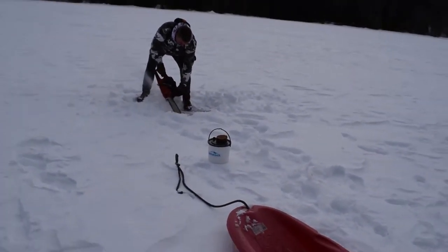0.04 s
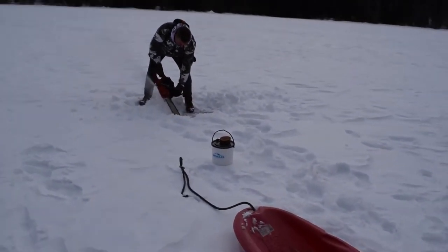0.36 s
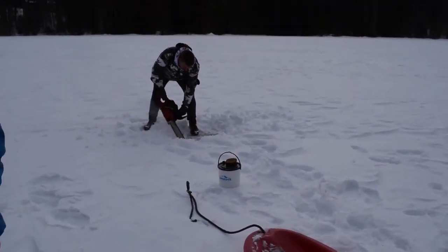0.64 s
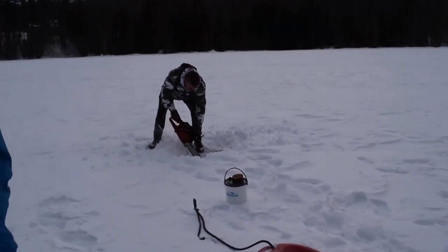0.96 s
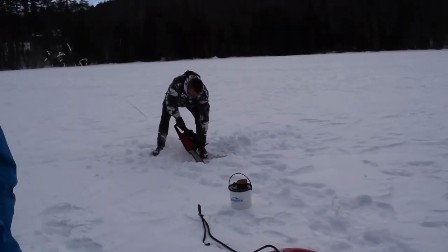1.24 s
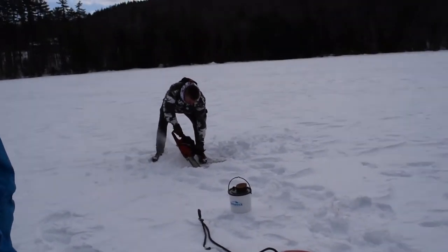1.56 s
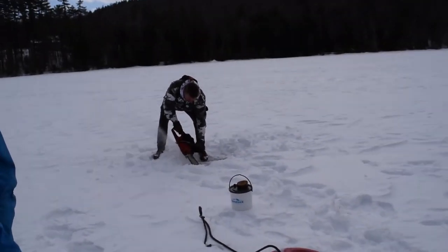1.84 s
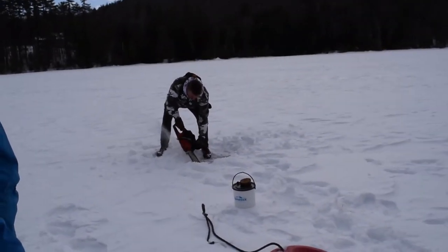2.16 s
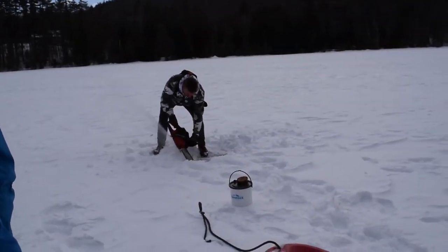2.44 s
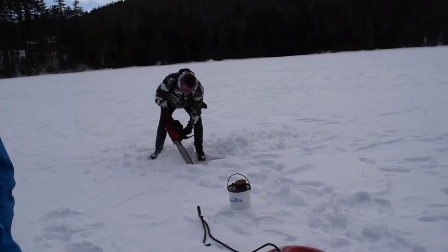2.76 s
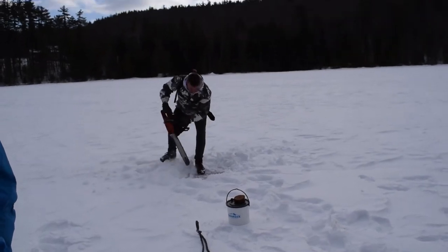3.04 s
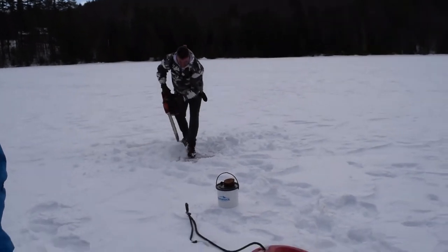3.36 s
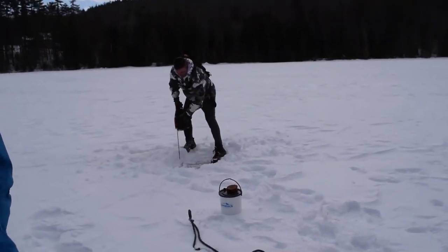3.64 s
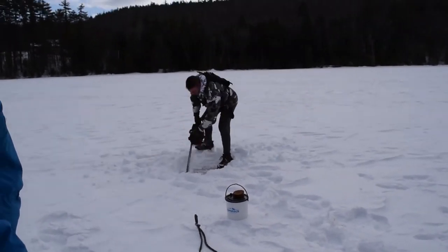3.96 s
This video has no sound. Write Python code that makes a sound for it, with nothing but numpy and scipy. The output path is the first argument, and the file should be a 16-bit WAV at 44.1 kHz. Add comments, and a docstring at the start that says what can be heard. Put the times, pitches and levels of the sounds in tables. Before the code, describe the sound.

A chainsaw cuts ice at full throttle a few metres away outdoors, a steady drone and whine with chain rattle and hissing spray. At about 2.6 seconds the throttle is released and the engine falls in pitch and level. It pops unevenly near idle from about 3.3 seconds, then revs up again from 3.8 to the end at 4 seconds. A light breeze rumbles underneath throughout.

```python
"""A two-stroke chainsaw cuts lake ice at full throttle, a few metres away in open snow.
Its exhaust drone, fan whine and piston buzz are harmonic series locked to the crankshaft; the many
small impacts of chain and ice spray add up to noise. The throttle is let go: the engine coasts down,
single firings ring the muffler near idle, and it revs up again. A light breeze rumbles underneath."""
import sys
import numpy as np
from scipy import signal
from scipy.fft import rfft, irfft
from scipy.io import wavfile
from scipy.ndimage import uniform_filter1d

SR = 44100
rng = np.random.default_rng(int(sys.argv[2]) if len(sys.argv) > 2 else 0)


def store_wav(level_fs):
    """Save 16-bit WAV to argv[1]."""
    pcm = np.round(np.clip(np.atleast_2d(level_fs), -1, 1) * 32767)
    wavfile.write(sys.argv[1], SR, pcm.T.astype(np.int16))


N = 176400
T = np.arange(N) / SR
RELEASE_S, REOPEN_S = 2.632, 3.808   # the throttle is let go, then opened again
WORKING_HZ = 209.5   # usual crankshaft speed in the cut; an order is a multiple of the crankshaft speed
GRAIN_DB = 1.5   # spread in the strength of small impacts

# envelope shared by chain rattle and piston buzz: t/s, level/dB
MECHANICAL_LEVEL = [(0, -29), (.55, -29), (.8, -27.5), (1.2, -28.5), (2.3, -30), (2.62, -28.5),
                    (2.87, -35.5), (3.13, -44), (3.29, -48), (3.52, -53), (3.65, -66), (3.79, -66),
                    (3.87, -46), (4, -36.5)]


def from_db(db):
    """Amplitude ratio of a level in decibels."""
    return 10 ** (np.asarray(db) / 20)


def unit_rms(x):
    """Normalisation to rms 1."""
    return x / np.sqrt(np.mean(x ** 2) + 1e-20)


def in_time(rows):
    """Linear interpolation of (t/s, value) rows."""
    return np.interp(T, *np.transpose(rows))


def drift(corner_hz):
    """Slow random fluctuation: low-passed noise of rms 1."""
    f = np.arange(N // 2 + 1) * SR / N
    return unit_rms(irfft(rfft(rng.standard_normal(N)) / (1 + (f / corner_hz) ** 2), N))


def colour(x, spectrum):
    """Spectral shaping by (f/Hz, level/dB) rows; white noise keeps its power."""
    hz, db = np.transpose(spectrum)
    f = np.arange(N + 1) * SR / (2 * N) + 1
    gain = from_db(np.interp(np.log(f), np.log(hz), db)) * np.minimum(f / hz[0], 1)
    return irfft(rfft(x, 2 * N) * unit_rms(gain))[:N]


def tone(turns, order):
    """A sinusoid of rms 1, phase-locked to the crankshaft."""
    return np.sqrt(2) * np.sin(2 * np.pi * (order * turns + rng.random()))


def impulses(rows):
    """One impulse for each (t/s, level/dB) row."""
    times, db = np.transpose(rows)
    clicks = np.zeros(N)
    clicks[(times * SR).astype(int)] = from_db(db)
    return clicks


def ring(clicks, hz, t60):
    """Damped oscillator: each impulse excites an exponentially decaying sinusoid."""
    r, w = from_db(-60 / (t60 * SR)), 2 * np.pi * hz / SR
    return signal.lfilter([0, np.sin(w)], [1, -2 * r * np.cos(w), r * r], clicks + 1e-18)


def puff(clicks, decay_s, spectrum):
    """Turbulent outflow: each impulse releases an exponentially decaying burst of gas noise."""
    envelope = signal.lfilter([1], [1, -np.exp(-1 / (decay_s * SR))], clicks + 1e-18)
    return colour(envelope * rng.standard_normal(N), spectrum)


def crank_harmonics(turns, size=8192, count=140, half_order_db=-10, jitter_turns=0.002):
    """A period of two turns gives whole orders and weaker half orders; phase jitter broadens them."""
    k = np.arange(1, count)
    partials = from_db(half_order_db * (k % 2)) * np.exp(2j * np.pi * rng.random(len(k)))
    cycle = unit_rms(irfft(np.r_[0, partials], size))
    angle = turns + jitter_turns * drift(93)
    return np.interp(angle / 2 % 1 * size, np.arange(size), cycle)


def wind(in_cut):
    """Turbulence: gusting low-frequency noise, with more rumble while the saw cuts."""
    # wind spectrum: f/Hz, relative level/dB
    spectrum = [(20, -12), (50, -1), (85, 4), (280, -3.5), (500, -17.5), (2000, -12), (12000, -47)]
    gusts = from_db(-48.5 + 2.5 * drift(18))
    rumble = in_cut * from_db(-52 + 2 * drift(9.2))
    return (gusts + rumble) * unit_rms(colour(rng.standard_normal(N), spectrum))


def impact_noise(turns, spectrum, level, throb):
    """Superposition: countless small impacts merge into noise, modulated in step with each turn."""
    bunching = np.exp(throb * (np.cos(2 * np.pi * turns) + 0.52 * np.cos(4 * np.pi * turns)))
    grains = rng.standard_normal(N) * bunching * from_db(GRAIN_DB * drift(1200) + 1.25 * drift(13))
    return from_db(in_time(level)) * unit_rms(colour(grains, spectrum))


def ice_spray(turns):
    """Impacts of the chain and of tiny ice chips sum incoherently to a hiss."""
    # hiss spectrum: f/Hz, relative level/dB
    spectrum = [(3000, -35), (5000, -23), (6100, 5), (7000, -2), (9000, -3.5), (11200, -5), (12500, -11),
                (15500, -20)]
    # hiss envelope: t/s, level/dB
    level = [(0, -39), (.6, -39), (.8, -37.5), (1.3, -42), (2.3, -40.5), (2.65, -41), (2.87, -45.5),
             (3.13, -48.5), (3.29, -54.5), (3.52, -61), (3.65, -75), (3.79, -72), (3.88, -59), (4, -46.5)]
    return impact_noise(turns, spectrum, level, throb=0.13)


def chain_rattle(turns):
    """Impacts of the chain links sum incoherently to a midrange rattle."""
    # rattle spectrum: f/Hz, relative level/dB
    spectrum = [(200, -44), (440, -26.5), (730, -2.5), (1030, -9.5), (1350, 2.5), (1650, -1), (2100, -5.5),
                (2600, -7.5), (3150, -4.5), (3900, -13), (4700, -9.5), (5500, -12.5), (8000, -34.5)]
    return impact_noise(turns, spectrum, MECHANICAL_LEVEL, throb=0.15)


def housing_knocks(turns, loose_share=0.63):
    """Forced vibration: knocks of crank and slack chain excite the modes of bar and housing."""
    # modes: f/Hz, bandwidth/Hz, relative level/dB
    modes = [(750, 183, 3.5), (1636, 180, 0.5), (2621, 120, -15), (3020, 83, -7.5), (4200, 310, -12),
             (4680, 170, -16)]
    # knock envelope: t/s, level/dB
    level = [(2.62, -32), (2.71, -32.5), (2.78, -35), (3.13, -39), (3.29, -41), (3.53, -40.5), (3.66, -45),
             (3.77, -48), (3.84, -41), (4, -41)]
    crank = (1 - loose_share) * crank_harmonics(turns)
    slack = loose_share * rng.standard_normal(N) * from_db(GRAIN_DB * drift(400))
    rings = sum(from_db(db) * signal.lfilter(*signal.iirpeak(hz, hz / width, SR), crank + slack)
                for hz, width, db in modes)
    rings = signal.sosfilt(signal.butter(4, 520, "high", fs=SR, output="sos"), rings)
    running_rms = np.sqrt(uniform_filter1d(rings ** 2, size=6000) + 1e-12)
    return from_db(in_time(level)) * rings / running_rms


def coast_whine(speed, turns, db_per_decade=44):
    """Resonance: falling, fading drive harmonics each swell as they pass a mode of the housing."""
    # drive harmonics: order, level/dB at working speed before the housing's gain
    harmonics = [(4, -32.5), (5, -39.5), (7, -38), (8, -35), (12, -41), (14, -37), (16, -39), (20, -38),
                 (24, -42.5)]
    # housing response: f/Hz, gain/dB
    response = [(550, -11.5), (780, 3), (1200, -7.5), (1540, 5), (1800, -6), (2800, 0)]
    whine = sum(from_db(db + np.interp(k * speed, *np.transpose(response)) + 2 * drift(40))
                * tone(turns, k) for k, db in harmonics)
    return (T < REOPEN_S) * from_db(db_per_decade * np.log10(speed / WORKING_HZ)) * whine


def piston_buzz(turns):
    """Periodic motion of piston and drive radiates a dense harmonic series."""
    # spectral envelope of the buzz: f/Hz, relative level/dB
    spectrum = [(900, -48), (1250, 1), (1850, -0.5), (2200, -4), (2700, 0.5), (3100, -2), (3900, -2.5),
                (4900, -4.5), (6500, -13), (9500, -11), (15000, -27)]
    return from_db(in_time(MECHANICAL_LEVEL) - 3.3) * unit_rms(colour(crank_harmonics(turns), spectrum))


def fan_whine(turns, in_cut):
    """Blade-passing tones of the flywheel, phase-modulated by uneven rotation, more so out of the cut."""
    # fan tones: order, relative level/dB
    tones = [(20, -11), (22, 0.5), (24, -13)]
    # fan envelope: t/s, level/dB
    level = [(0, -30.5), (.45, -29.5), (.56, -26), (.69, -31.5), (1.16, -33.5), (1.38, -30.5), (1.7, -33),
             (1.92, -30.5), (2.05, -33), (2.62, -28), (2.71, -33), (2.78, -41), (2.95, -46), (3.15, -52),
             (3.7, -59), (3.9, -66), (4, -37)]
    jitter_turns = 0.0012 + 0.0023 * (1 - in_cut)
    angle = turns + jitter_turns * drift(78)
    return from_db(in_time(level)) * sum(from_db(db + drift(11.4)) * tone(angle, k) for k, db in tones)


def firings(clicks, ring_db, puff_db, damping):
    """Impulse response: a firing rings the muffler and emits a puff; the ice reflects both."""
    # muffler modes: f/Hz, relative level/dB, T60/s before division by damping
    modes = [(150, -29, 0.016), (280, -21, 0.024), (655, -2, 0.015), (860, -17.5, 0.011),
             (1368, -18.5, 0.014), (1690, -25, 0.012)]
    # spectrum of the gas puff: f/Hz, relative level/dB
    spectrum = [(130, -3), (400, -11), (750, 0), (1900, 2.5), (2600, -14), (4200, -9), (15000, -31)]
    ring_floor_hz = 150   # the muffler rings carry little below this
    reflection_s, reflection_db = 0.001303, -2.5
    rings = sum(from_db(db) * ring(clicks, hz, t60 / damping) for hz, db, t60 in modes)
    rings = signal.sosfilt(signal.butter(1, ring_floor_hz, "high", fs=SR, output="sos"), rings)
    direct = from_db(puff_db) * puff(clicks, 0.002, spectrum) - from_db(ring_db) * rings
    return direct + from_db(reflection_db) * np.interp(T - reflection_s, T, direct)


def idle_pops():
    """Intermittent combustion near idle gives separate, heavily damped transients."""
    # single firings: t/s, excitation level/dB
    pops = [(3.3527, -19.5), (3.4214, -19.5), (3.4933, -21), (3.5540, -19.5), (3.648, -27), (3.6637, -21),
            (3.7448, -19)]
    return firings(impulses(pops), ring_db=1, puff_db=-10.5, damping=3.2)


def exhaust_cracks():
    """Broadband transients: the first hard firings on the reopened throttle crack brightly."""
    # hard firings: t/s, excitation level/dB
    onsets = [(3.8095, -30.5), (3.8375, -29)]
    # crack spectrum: f/Hz, relative level/dB
    spectrum = [(900, 3), (1500, 4), (4500, -5.5), (15000, -28)]
    return puff(impulses(onsets), decay_s=0.0056, spectrum=spectrum)


def rev_up(speed, turns):
    """An accelerating pulse train, one firing a turn, drives the muffler over a rising thump."""
    # thump harmonics: order, level/dB at thump_hz
    harmonics = [(1, -32.5), (2, -43), (3, -43)]
    thump_hz, db_per_decade = 124, 48
    second_wave_s, second_wave_db = 0.00589, -13.5   # a weaker pressure wave follows each firing
    is_open = T >= REOPEN_S
    thump_gain = is_open * from_db(db_per_decade * np.log10(speed / thump_hz))
    thump = thump_gain * sum(from_db(db) * tone(turns, k) for k, db in harmonics)
    pulses = np.diff(np.ceil(np.cumsum(speed * is_open) / SR), prepend=0)
    pulses = pulses + from_db(second_wave_db) * np.interp(T - second_wave_s, T, pulses)
    weak_start_db = -4 * np.exp(-np.maximum(T - REOPEN_S, 0) / 0.018)
    strength = from_db(-19.5 + weak_start_db + 0.8 * drift(60))
    return thump + firings(pulses * strength, ring_db=5, puff_db=-17, damping=0.75)


def engine_speed(idle_hz=32.99, coast_s=0.492, reopen_hz=60.75, rise_hz_per_s=360):
    """Rotation sets the fundamental: high in the cut, relaxing towards idle, then rising linearly."""
    # crankshaft speed under load: t/s, f/Hz
    loaded = [(0, 205), (.12, 203.3), (.33, 205.7), (.51, 203.3), (.7, 216.6), (.82, 215.8), (.93, 216.6),
              (1.02, 212.3), (1.27, 208.2), (1.44, 209.4), (1.73, 206.3), (1.92, 210), (2.0, 205.3),
              (2.3, 208.4), (2.46, 203.7), (2.62, 209.4)]
    coast = idle_hz + (in_time(loaded) - idle_hz) * np.exp(-np.maximum(T - RELEASE_S, 0) / coast_s)
    return np.where(T < REOPEN_S, coast, reopen_hz + rise_hz_per_s * (T - REOPEN_S))


def exhaust(speed, turns, in_cut, pump_db_per_decade=50):
    """Periodic gas flow radiates harmonics: a strong drone in the cut, weaker pumping out of it."""
    # drone, with half orders from alternate strong and weak firings: order, level/dB
    drone_tones = [(.5, -43.5), (1, -26.5), (1.5, -46), (2, -42), (2.5, -54.5)]
    # muffler tones that grow under load: order, level/dB before bark_gain
    bark_tones = [(3.5, -36.5), (4, -29)]
    # envelope of those tones: t/s, gain/dB
    bark_gain = [(0, 3.5), (.54, 4), (.7, -1), (1.2, -2.5), (1.8, -1.5), (2.3, 0), (2.52, 0.5),
                 (2.62, -0.5)]
    # higher exhaust and drive tones: order, level/dB at working speed, swell with speed/(dB/Hz)
    upper_tones = [(2.996, -34, 0.55), (4.994, -48.5, 1.6), (5.996, -35, 0.63), (6.997, -38, 0.11),
                   (9, -41.5, 0.48), (10.01, -45, 0.57), (12, -43.5, 0.65), (14, -42.5, 0.9),
                   (14.99, -42, 0.096), (29, -46.5, 0.21), (43, -53, 0.14)]
    # unfired pumping: order, relative level/dB
    pump_tones = [(1, 0), (2, -10), (3, -29)]
    drone = sum(from_db(db + 0.11 * drift(6.7)) * tone(turns, k) for k, db in drone_tones)
    bark = sum(from_db(db + 0.26 * drift(24)) * tone(turns, k) for k, db in bark_tones)
    excess_hz = np.maximum(speed - WORKING_HZ, -2)
    upper = sum(from_db(db + swell * excess_hz + 1.87 * drift(2.4)) * tone(turns, k)
                for k, db, swell in upper_tones)
    pump = sum(from_db(db + 1.6 * drift(25)) * tone(turns, k) for k, db in pump_tones)
    pump = pump * from_db(-32 + pump_db_per_decade * np.log10(speed / WORKING_HZ))
    return in_cut * (drone + from_db(in_time(bark_gain)) * bark + upper) + (1 - in_cut) * pump


def scene():
    """Superposition of saw and breeze, the same in both channels."""
    speed = engine_speed()
    turns = np.cumsum(speed + 0.2205 * drift(14.7)) / SR
    in_cut = np.clip((RELEASE_S - T) / 0.025, 0, 1)   # falls to 0 as the throttle shuts, and stays there
    running = exhaust(speed, turns, in_cut) + fan_whine(turns, in_cut) + piston_buzz(turns)
    unloaded = (1 - in_cut) * (housing_knocks(turns) + coast_whine(speed, turns))
    firing = idle_pops() + exhaust_cracks() + rev_up(speed, turns)
    cutting = chain_rattle(turns) + ice_spray(turns)
    return np.tile(running + unloaded + firing + cutting + wind(in_cut), (2, 1))


def record(dry):
    """Band limiting by a steep low-pass filter, with a 2 ms fade at each end."""
    cutoff_hz = 15700
    fades = np.clip(np.minimum(T, T[-1] - T) / 0.002, 0, 1)
    return signal.sosfilt(signal.ellip(12, 0.1, 80, cutoff_hz, fs=SR, output="sos"), dry * fades)


dry = scene()
out = record(dry)
store_wav(out)
```